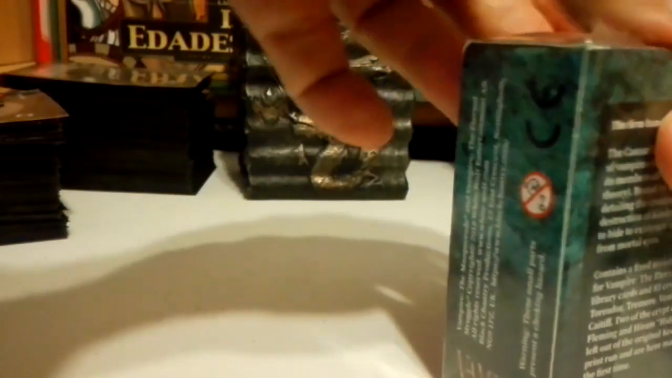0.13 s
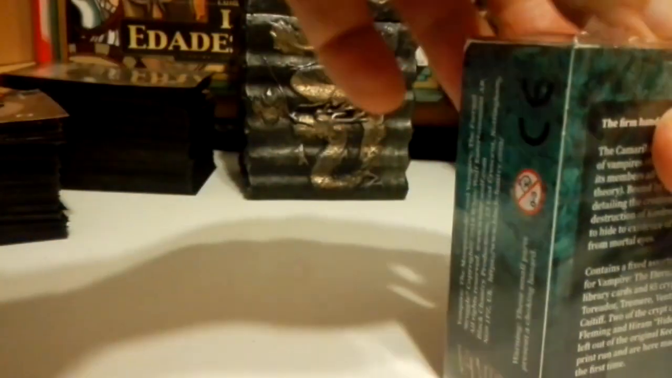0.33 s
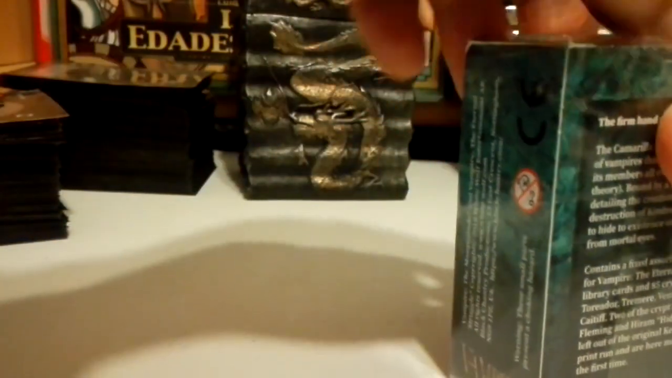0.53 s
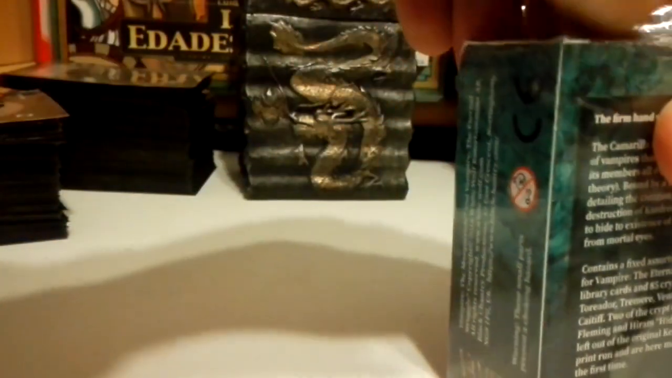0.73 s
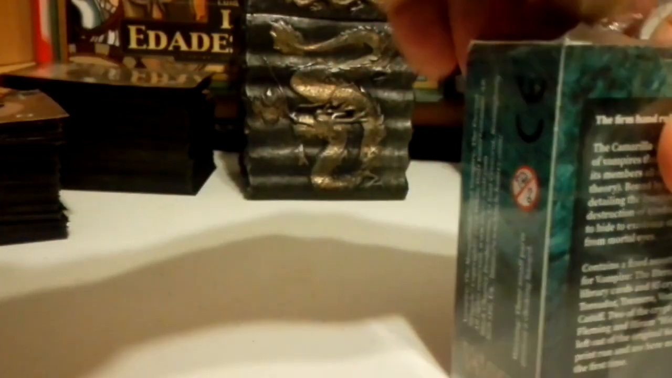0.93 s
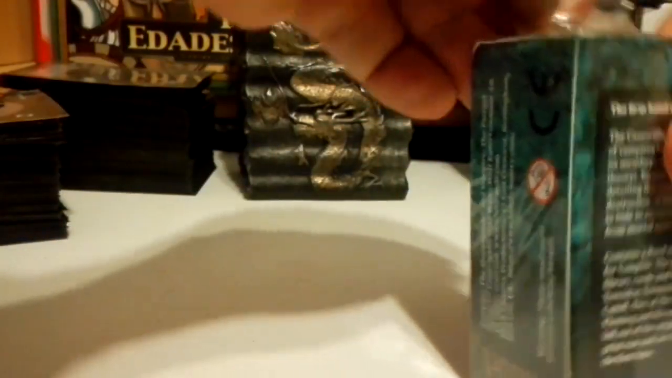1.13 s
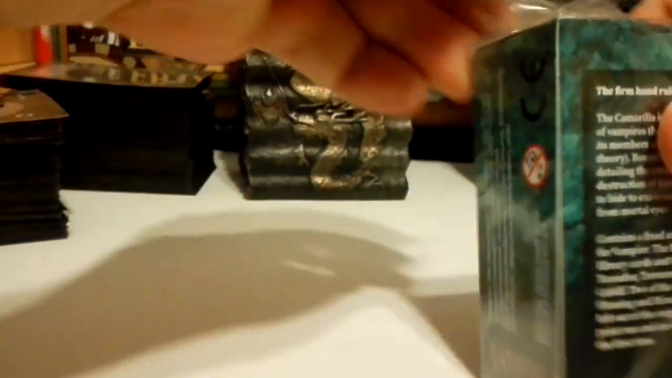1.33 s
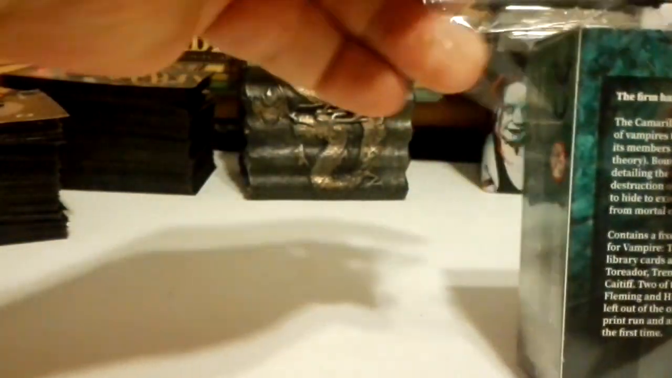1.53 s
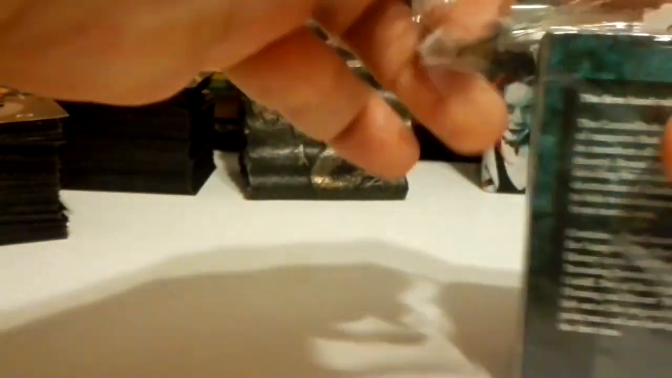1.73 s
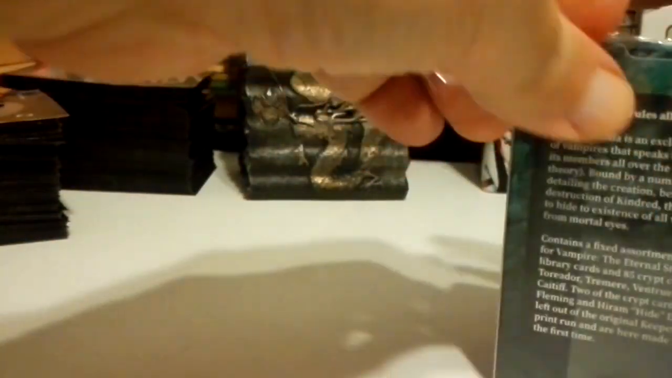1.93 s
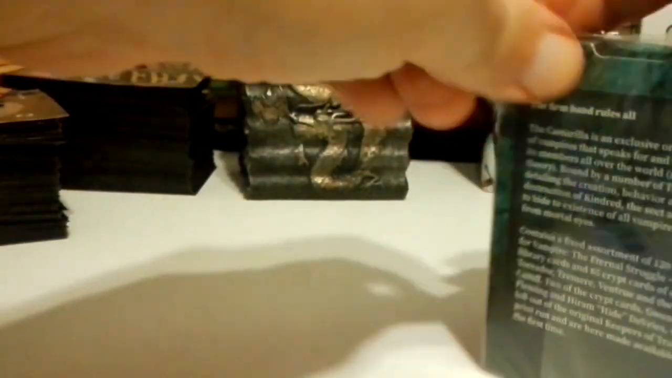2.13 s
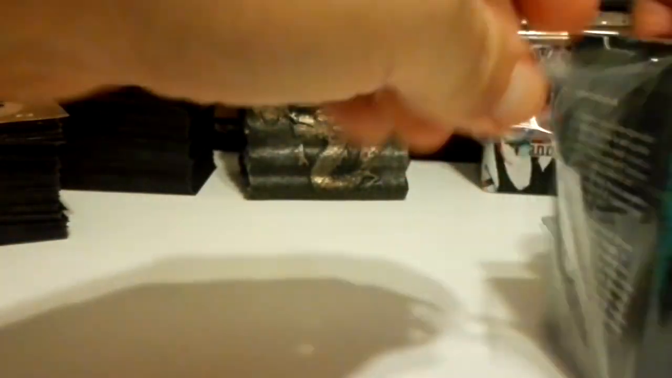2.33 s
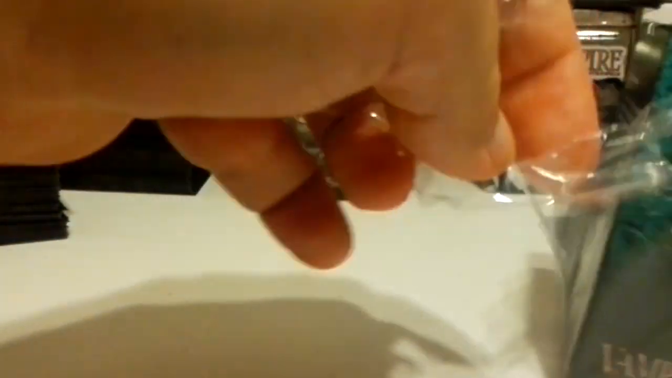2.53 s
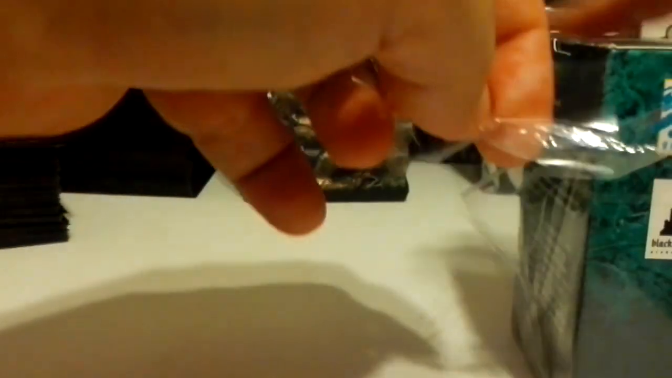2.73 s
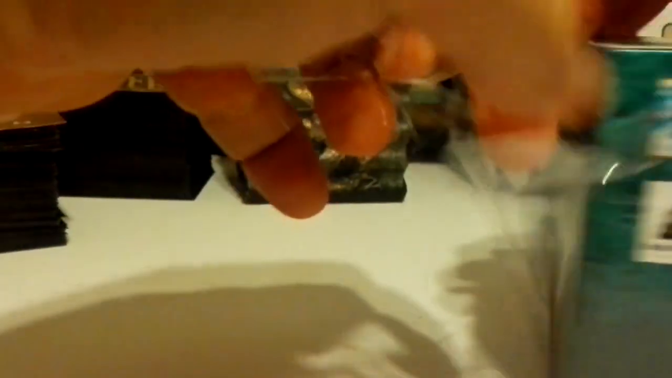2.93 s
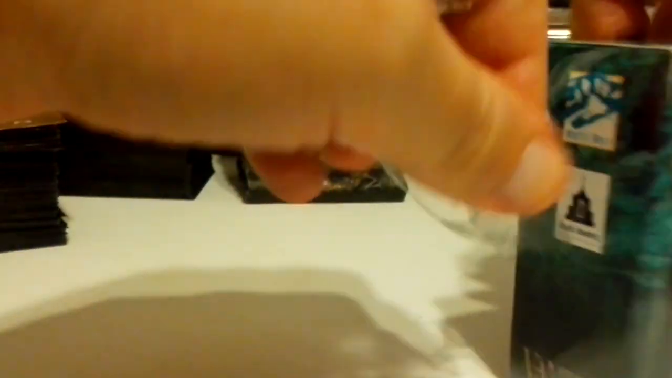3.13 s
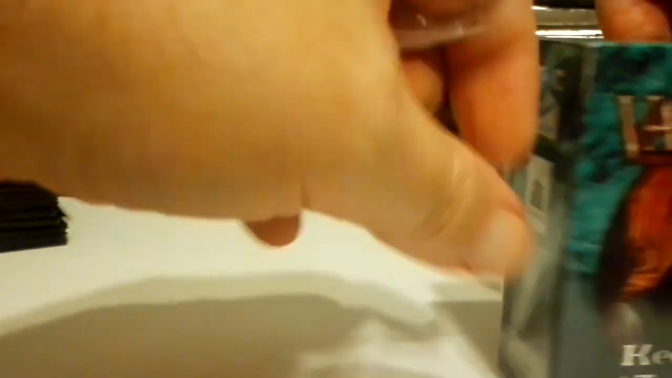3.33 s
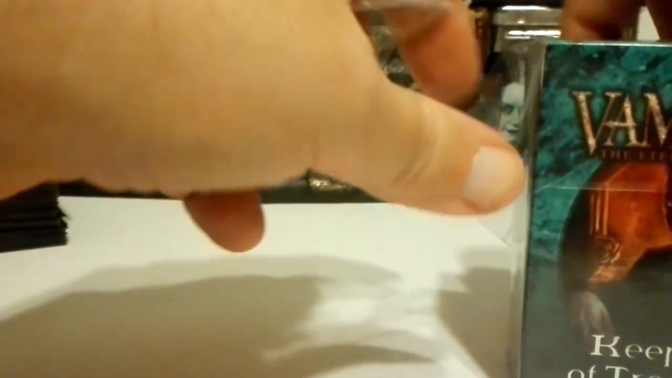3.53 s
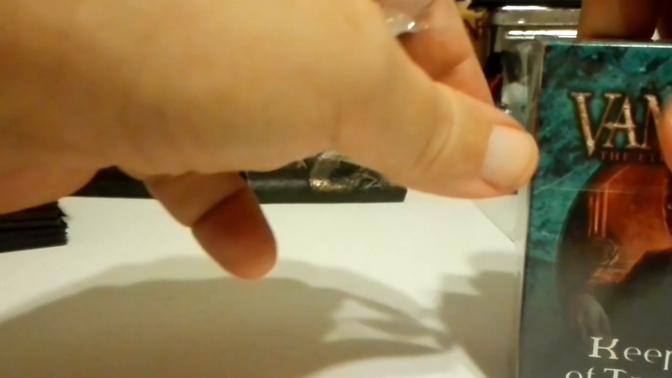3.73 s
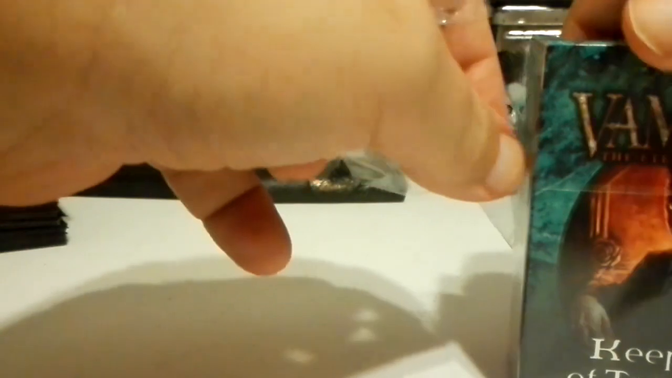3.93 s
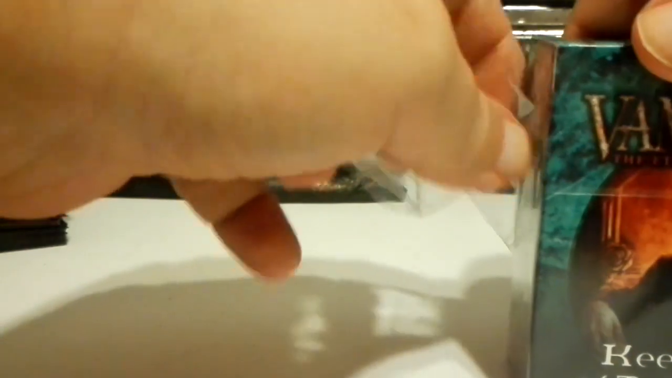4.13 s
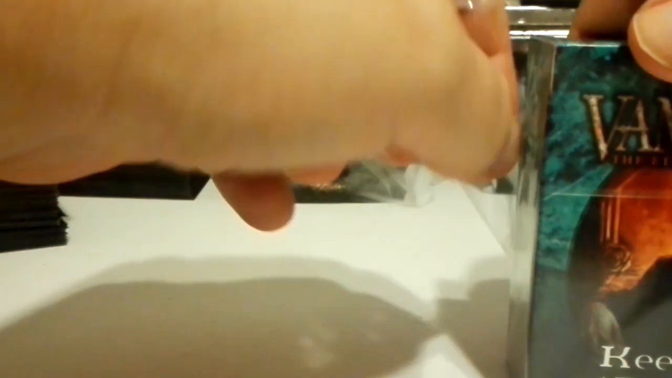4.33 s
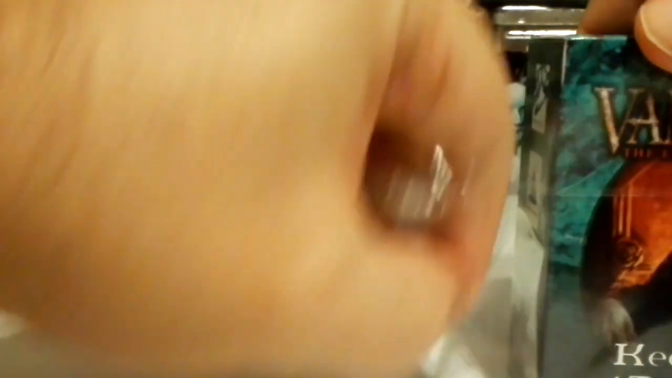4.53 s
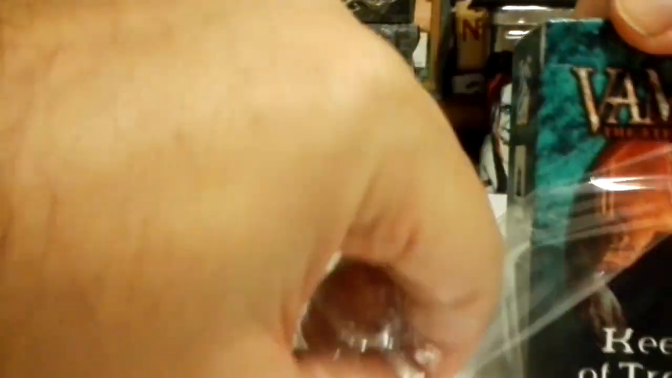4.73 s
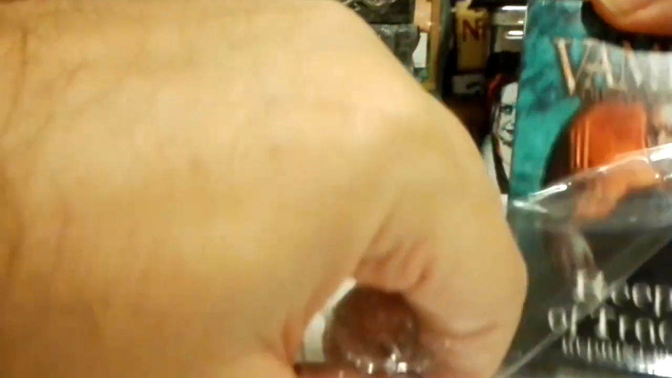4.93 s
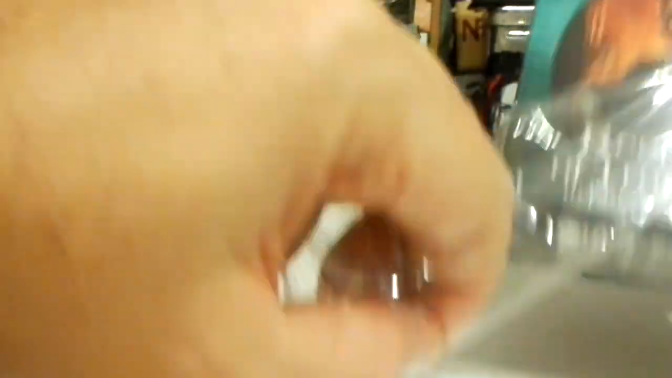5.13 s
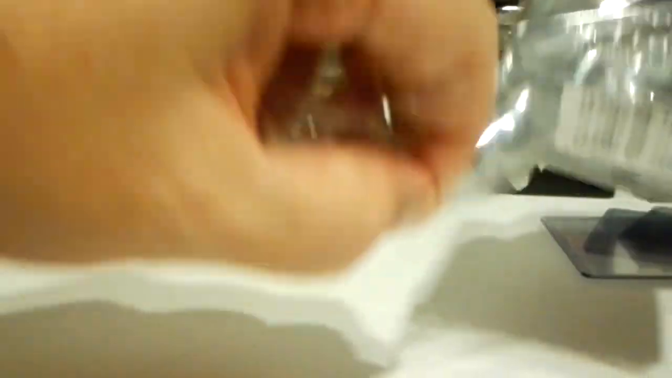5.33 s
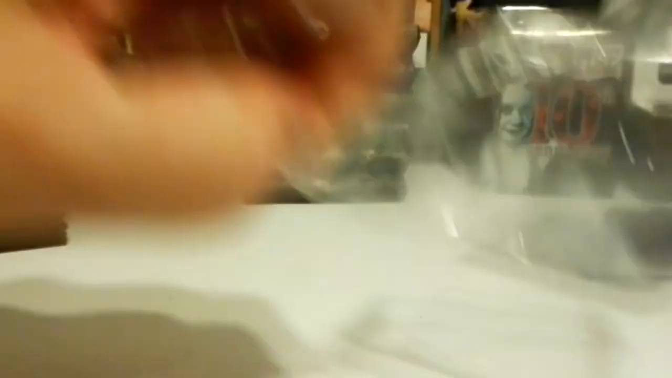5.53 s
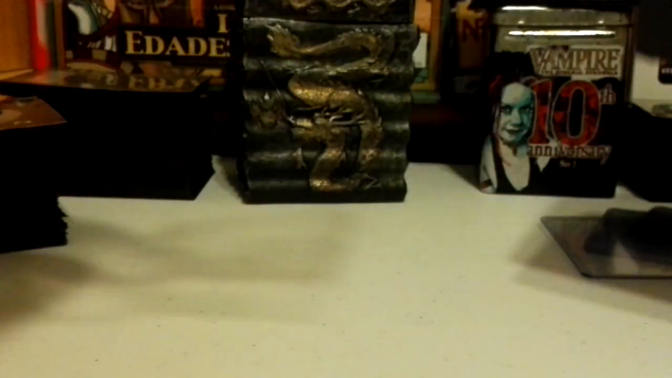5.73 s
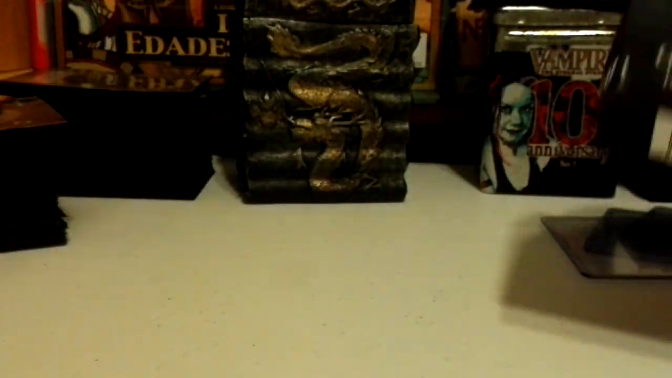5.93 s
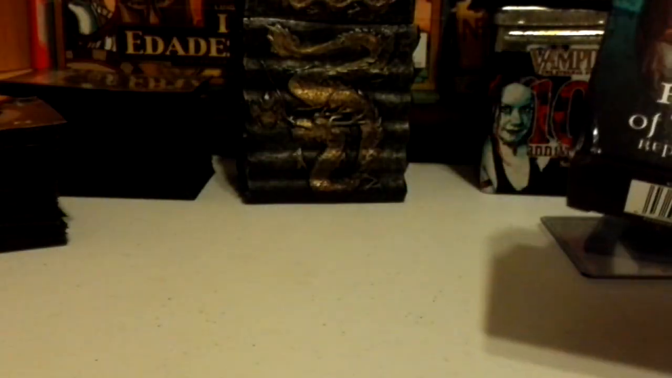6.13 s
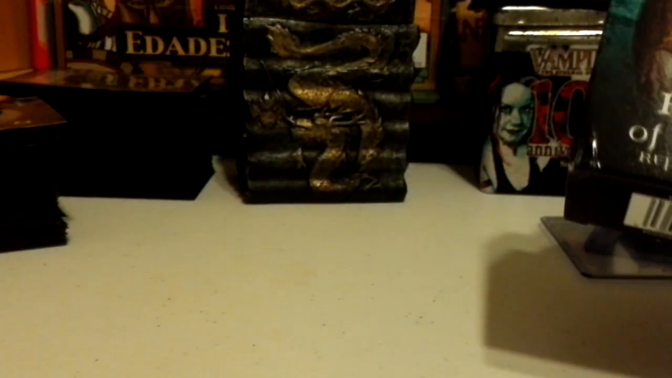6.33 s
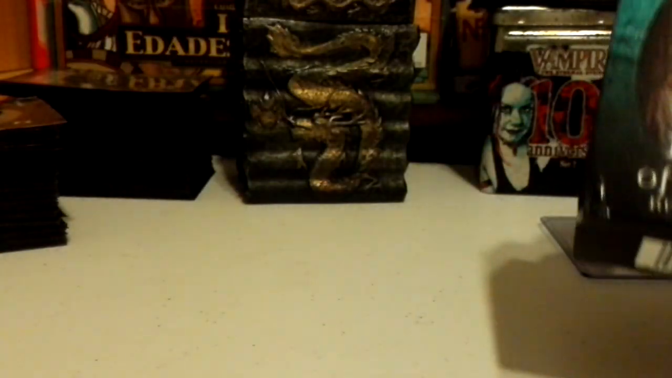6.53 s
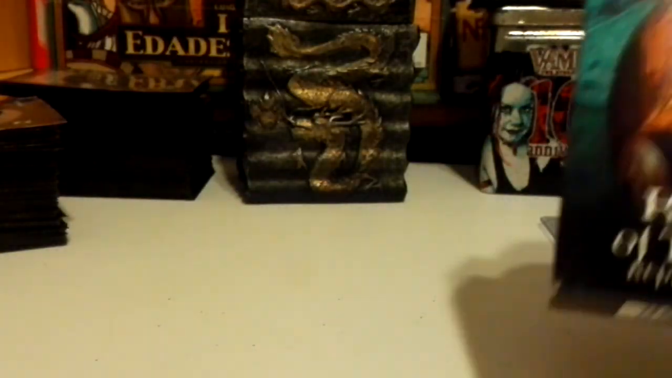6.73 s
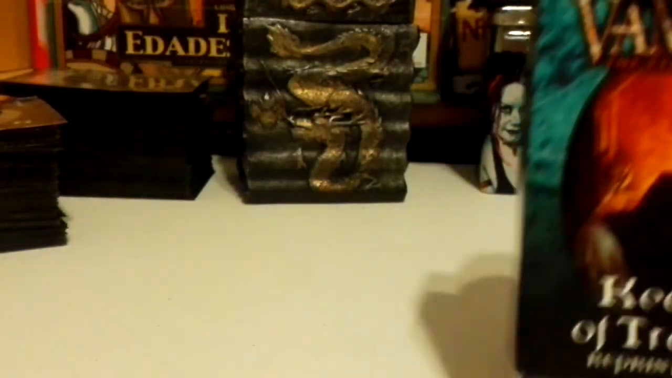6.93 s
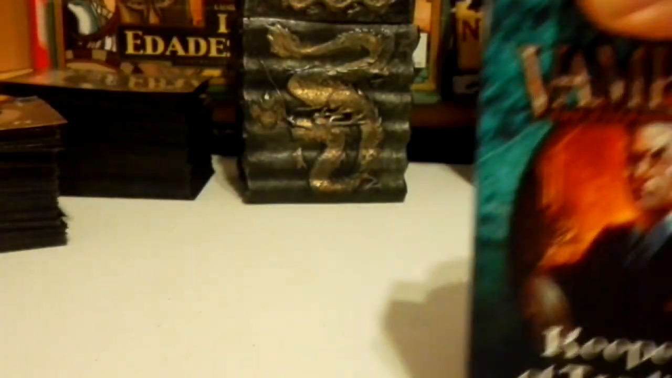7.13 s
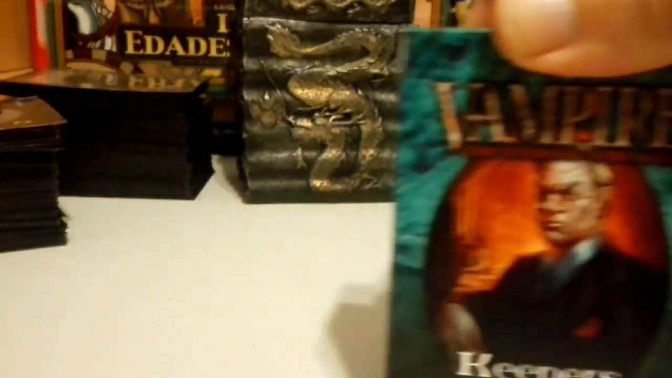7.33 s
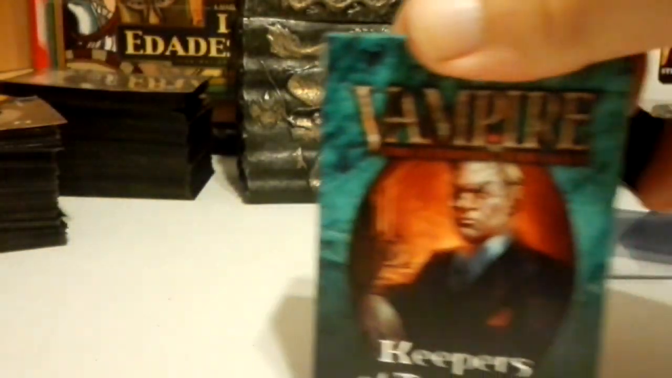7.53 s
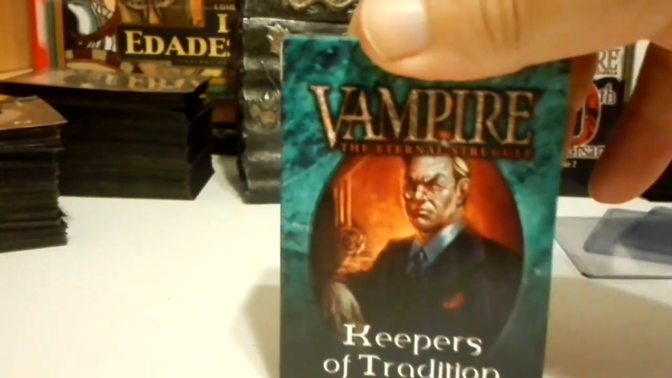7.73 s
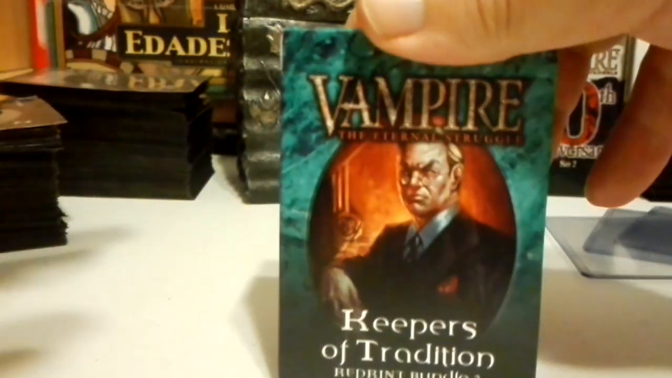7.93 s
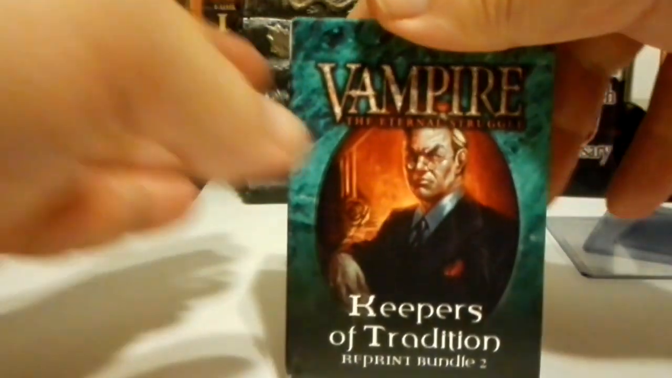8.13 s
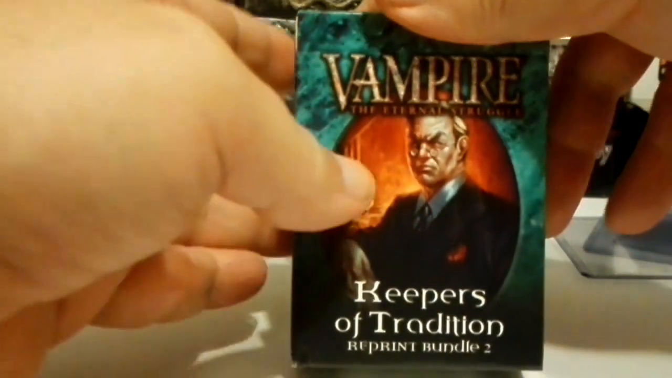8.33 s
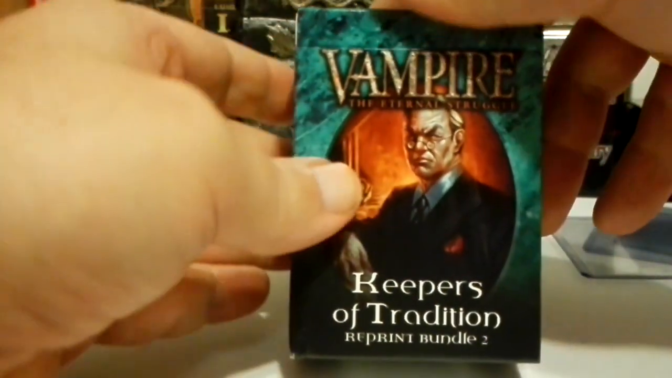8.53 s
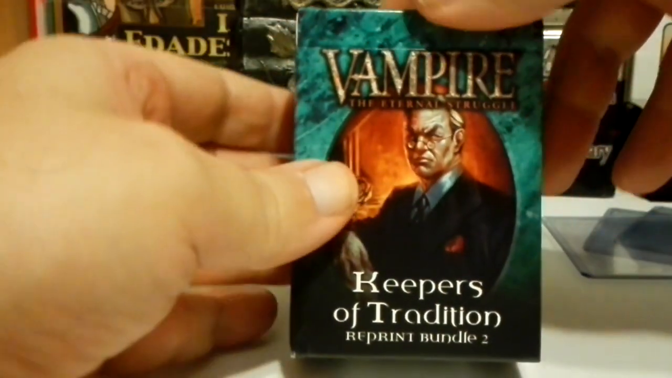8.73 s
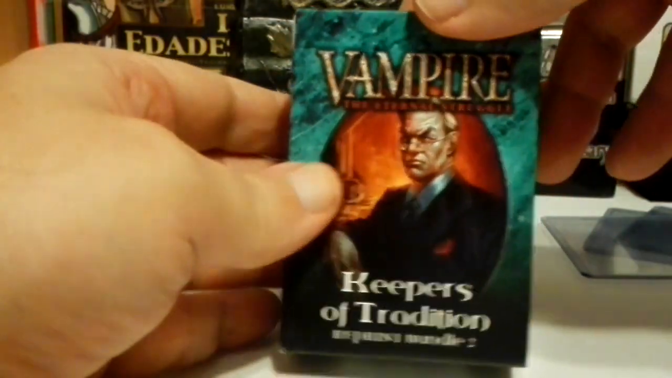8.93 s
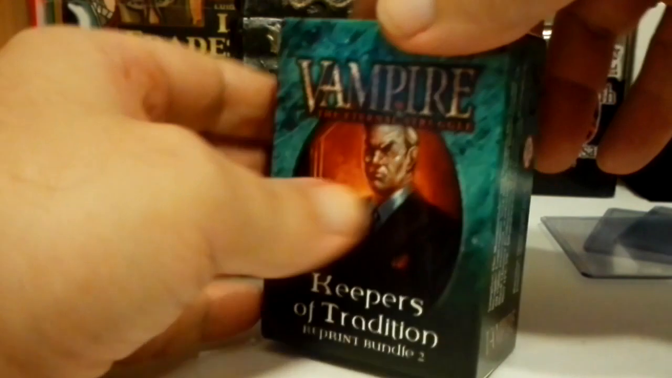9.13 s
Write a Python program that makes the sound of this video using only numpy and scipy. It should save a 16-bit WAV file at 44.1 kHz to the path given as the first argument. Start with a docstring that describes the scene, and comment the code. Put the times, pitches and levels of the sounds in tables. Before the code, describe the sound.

Thin plastic wrap is torn off a small card box, crackling sharply close by, then thins out to faint handling and near silence.

```python
"""Shrink wrap is torn off a small card box and crumpled by hand, close to the left one of two microphones.
It starts with light tugs; from about 0.6 to 5.7 s sharp snaps of buckling film, shaped from bursts of noise,
stand over a bed of tiny crinkles, with short rings of freed panels and soft sine bumps on the hollow box.
The crackle thins out; light handling stops at 7 s, with one faint tug and snap after it, then skin rubs and
touches the card. A small room answers film and bumps; still air and a low hum go on underneath throughout."""
import sys
import numpy as np
from scipy import signal
from scipy.fft import rfft, irfft, next_fast_len
from scipy.io import wavfile
from scipy.ndimage import uniform_filter1d

SR = 44100
rng = np.random.default_rng(int(sys.argv[2]) if len(sys.argv) > 2 else 0)


def log_audio(samples):
    """Write samples as a 16-bit WAV file to the path given in sys.argv[1]."""
    # one column per channel
    frames = np.atleast_2d(samples).T
    # limit to full scale, then quantise
    limited = np.clip(frames, -1, 1)
    pcm = np.round(limited * 32767).astype(np.int16)
    wavfile.write(sys.argv[1], SR, pcm)


N = 405273

# the loudest creases snapping through, levels before trims:
# (time [s], sizzle level [dB], crack level [dB], body level [dB], pitch of the freed panel [Hz])
LARGE_SNAPS = [(0.3294, -28.5, -44, -66.5, 509), (0.4628, -37, -39.5, -61, 452),
               (0.5222, -36, -42.5, -58, 610), (0.6097, -21, -30, -49, 2130), (0.6651, -14, -21, -53, 2540),
               (0.7052, -16, -23, -52, 2600), (0.7913, -13.5, -26.5, -45, 2130),
               (0.8309, -11.5, -21.5, -40, 2030), (0.8584, -10.5, -36, -41, 2160),
               (0.8839, -12.5, -30.5, -42, 1370), (0.941, -20, -26.5, -36, 1380),
               (0.9778, -15, -19, -50, 1890), (0.9837, -28, -26, -32, 1670),
               (1.0833, -27.5, -29.5, -49, 2470), (1.1016, -24, -32, -33.5, 1700),
               (1.1528, -28.5, -27, -53, 2200), (1.1904, -17, -31.5, -36, 2200),
               (1.2146, -15, -27.5, -36, 2380), (1.242, -12, -23, -32, 2290),
               (1.2477, -5, -16.5, -32, 2280), (1.2534, -13.5, -26, -27, 1920),
               (1.2613, -15, -16.5, -27, 1930), (1.283, -10, -24, -32, 1996),
               (1.2978, -8.5, -21, -32, 2260), (1.3105, -11.5, -18.5, -23.5, 1870),
               (1.372, -14, -30.5, -27.5, 2010), (1.4262, -9.5, -18, -31, 604),
               (1.505, -17.5, -35, -43, 630), (1.5303, -19.5, -31.5, -49, 708),
               (1.5407, -19, -27, -36.5, 580), (1.5657, -17, -36, -40, 890), (1.694, -7, -24, -29.5, 866),
               (1.73, -21, -32.5, -38.5, 958), (1.7884, -12.5, -31, -46, 586),
               (1.7985, -9.5, -30, -58, 1290), (1.8461, -14.5, -27, -34, 1910),
               (1.8876, -18, -25, -46, 2590), (1.9515, -16.5, -28, -41.5, 1310),
               (2.0851, -19.5, -43, -29.5, 1370), (2.109, -10, -32, -37, 1300),
               (2.1558, -17, -31, -43, 1340), (2.2436, -21, -34.5, -47, 630), (2.2622, -14, -28, -50, 700),
               (2.2773, -8, -16, -32, 617), (2.2924, -10.5, -31, -34, 1410),
               (2.3276, -7.5, -23, -26.5, 660), (2.3476, -7.5, -34, -36, 649),
               (2.381, -13, -26.5, -44, 730), (2.3969, -10.5, -26, -40, 611),
               (2.4928, -21.5, -31.5, -42, 495), (2.5546, -14, -28, -34.5, 623),
               (2.5945, -14.5, -26, -34, 670), (2.6323, -21, -30, -41, 1360), (2.6497, -14, -25, -38, 2130),
               (2.7293, -17, -33, -42, 600), (2.7603, -19.5, -26.5, -51, 2040),
               (2.802, -16.5, -32, -50, 1980), (2.836, -20.5, -37.5, -54, 2260),
               (2.898, -23.5, -36, -49, 635), (2.9387, -20, -30.5, -38, 624), (3.0065, -12, -28, -54, 2260),
               (3.035, -11.5, -33, -57, 2350), (3.0545, -10.5, -34, -35, 694),
               (3.0831, -19.5, -26, -32, 1280), (3.1442, -17, -29, -45, 2240),
               (3.1649, -14, -25.5, -41, 645), (3.2098, -10, -33, -36, 2150),
               (3.247, -9.5, -28.5, -32, 750), (3.298, -10, -26.5, -33, 1230), (3.4023, -9, -40, -43, 2370),
               (3.4206, -21.5, -28.5, -28.5, 676), (3.4431, -12, -37, -27, 590),
               (3.5332, -24, -36.5, -48, 2420), (3.6962, -22, -34, -44, 991),
               (3.7108, -19.5, -42, -54, 630), (3.7645, -21, -38.5, -38, 657),
               (3.8118, -19.5, -31.5, -63, 2340), (3.919, -17, -44, -41.5, 880),
               (4.0123, -28.5, -33, -51, 670), (4.0893, -22.5, -50, -64, 574), (4.138, -31, -43, -52, 750),
               (4.291, -22.5, -38, -43, 657), (4.3251, -18, -43, -43.5, 708),
               (4.3986, -12.5, -39, -48, 1320), (4.4296, -7, -30, -31.5, 614),
               (4.4842, -6.5, -23.5, -30.5, 1260), (4.5134, -6.5, -23.5, -32, 620),
               (4.5902, -14, -37, -44, 650), (4.6688, -19, -55, -52, 452), (4.764, -7, -22.5, -18.5, 1266),
               (4.8482, -17, -40, -55, 1380), (4.904, -7, -25, -51, 2450),
               (4.9739, -11.5, -28.5, -39.5, 950), (4.985, -6, -29, -33, 694),
               (5.022, -18, -25.5, -45, 614), (5.0515, -24.5, -27, -30, 1300),
               (5.114, -9.5, -31.5, -34, 660), (5.1359, -22, -27, -57, 610),
               (5.294, -25, -31.5, -47.5, 657), (5.4102, -15.5, -27, -53, 1440),
               (5.4818, -21, -42, -41.5, 1320), (5.5022, -19, -34.5, -42, 991), (5.52, -30, -44, -41, 603),
               (5.6085, -13, -42, -61, 626), (5.7096, -19.5, -31.5, -50, 773), (5.8657, -27, -38, -52, 980),
               (6.129, -33, -48, -67, 2340), (6.2447, -27, -50, -49, 2200), (6.354, -25.5, -50, -49, 1670),
               (6.6827, -39, -44, -52, 1720), (6.793, -40, -50, -62, 1950), (6.9272, -34.5, -54, -75, 460),
               (7.2607, -43.5, -62, -58, 610)]
HANDLING_END_S = 7.04  # the light handling and the lesser snaps stop


def snaps(pull_db, length_s=0.0045):
    """Creases give way one by one, some as a dry tick, some with a flutter; low ranges move more slowly."""
    # a large crease cracks 0.6 ms after its listed time; the rest are level trims in dB
    large = np.array(LARGE_SNAPS)[:, :4] + [0.0006, -5, 0, -5]
    times, *levels_db = np.vstack([large, small_snaps(pull_db)]).T
    dryness = rng.random(N)[:len(times)] ** 2
    envelopes = []
    for db, slow in zip(levels_db, [1, 1.5, 1.7]):
        energy = amp(db) ** 2 * length_s * SR
        tick = buckle(strikes(times, energy * dryness), crack_t60=0.0024 * slow,
                      flutter_t60=0.019, flutter_db=-11.5, swell_t60=0.006, swell_db=-10.5)
        flutter = buckle(strikes(times, energy * (1 - dryness)), crack_t60=0.0015,
                         flutter_t60=0.019 * slow, flutter_db=0, swell_t60=0.0038, swell_db=-1)
        envelopes.append(np.hypot(tick, flutter))
    return radiate(*envelopes)


def small_snaps(pull_db, per_second=16, over_db=5, spread_db=3, ceiling_db=-27, count=400):
    """Lesser creases give way at random during the handling: rows (s, sizzle dB, crack dB, body dB)."""
    when, chance = rng.random((count, 2)).T
    times = when * HANDLING_END_S
    db = pull_db[:, (times * SR).astype(int).clip(0, N - 1)] + over_db
    too_loud_db = np.maximum(db[0] - ceiling_db, 0)
    db = db - too_loud_db + spread_db * rng.standard_normal((count, 3)).T
    return np.vstack([times, db]).T[chance < per_second * HANDLING_END_S / count]


def crinkle(pull_db, per_second=750, loud_db=-28, crowding=0.51, spread_db=6, order=1700):
    """Tiny creases pop at random: single ticks under a light touch, a dense tearing under a hard pull."""
    # per_second holds when the sizzle is at loud_db; the rate never falls below 300 per second
    rate = np.maximum(per_second * amp(crowding * (pull_db[0] - loud_db)), 300)
    pops = (rng.random(N) < rate / SR) * amp(spread_db * rng.standard_normal(N)) ** 2
    envelopes = []
    for db, trim_db in zip(pull_db, [-1, -0.5, -1.5]):
        own = pops * amp(3.2 * rng.standard_normal(N)) ** 2
        own /= np.abs(uniform_filter1d(own, order)) + 1e-7  # neighbouring pops share the hand's pull
        grain = buckle(own, crack_t60=0.0017, flutter_t60=0.027, flutter_db=1, swell_t60=0.0053, swell_db=1.5)
        envelopes.append(grain * amp(db + trim_db))
    return radiate(*envelopes)


def panels(cycles=22, level_db=2):
    """Each large snap frees a taut panel of film, which rings for a few cycles like a tiny drum."""
    out = np.zeros((2, N + SR))
    t = np.arange(SR // 20) / SR
    phases = rng.normal(0, 1.0, (len(LARGE_SNAPS), 2))
    for (start, _, _, body_db, hz), phase in zip(LARGE_SNAPS, phases):
        decay = amp(body_db + level_db - 60 * hz * t / cycles)
        ring = decay * (1 - np.exp(-2 * hz * t))
        out[:, round(start * SR):][:, :len(t)] += ring * np.sin(2 * np.pi * hz * t + phase[:, None])
    return out[:, :N] * amp([[1], [-1]])  # left a little louder than right


def pull():
    """Sizzle, crack and body levels of the moving film in dB: tugs on top of light handling."""
    # tugs and squeezes, levels of the pull before trims:
    # (start [s], length [s], sizzle level [dB], body level [dB])
    tugs = np.array([(0.026, 0.07, -43.5, -63), (0.158, 0.074, -47, -66), (0.277, 0.066, -49, -66.5),
                     (0.444, 0.025, -50, -66), (0.532, 0.078, -44, -62), (0.647, 0.062, -25.5, -45.5),
                     (0.782, 0.062, -24.5, -51), (0.955, 0.033, -26.5, -36.5), (1.227, 0.11, -25.5, -40),
                     (1.36, 0.13, -32, -55), (1.549, 0.033, -30.5, -50), (1.697, 0.016, -44, -52.5),
                     (1.813, 0.086, -29.5, -45), (2.078, 0.055, -27.5, -43.5), (2.271, 0.084, -23.5, -36),
                     (2.384, .055, -25.5, -45), (2.585, 0.0083, -22, -35.5), (2.608, 0.007, -33, -62),
                     (2.749, 0.027, -24.5, -50), (2.822, 0.01, -21, -41), (3.047, 0.032, -24.5, -36),
                     (3.151, 0.0092, -30.5, -38.5), (3.262, 0.076, -29, -41), (3.391, 0.049, -18, -35),
                     (3.682, 0.036, -31.5, -51.5), (3.937, 0.016, -31, -50), (4.103, 0.0077, -49, -51),
                     (4.163, 0.006, -33.5, -44), (4.283, 0.021, -41, -48), (4.395, 0.076, -25.5, -42.5),
                     (4.511, 0.049, -40, -47), (4.595, 0.011, -27, -40.5), (4.764, 0.015, -30, -46.5),
                     (4.922, 0.019, -28, -55.5), (4.984, 0.066, -23.5, -48), (5.122, 0.052, -29.5, -48.5),
                     (5.351, 0.058, -25, -50.5), (5.384, 0.032, -21, -36.5), (5.459, 0.088, -31, -55),
                     (5.608, 0.015, -29, -52.5), (5.711, 0.028, -29.5, -56), (5.88, 0.12, -44.5, -65.5),
                     (6.178, 0.11, -44, -65), (6.356, 0.028, -43, -65), (6.509, 0.032, -45.5, -65),
                     (6.613, 0.084, -44.5, -65), (6.772, .1, -53.5, -69), (6.979, 0.013, -52, -65),
                     (7.162, .015, -50, -68)])
    # light handling of the film between tugs, before the offsets below: (time [s], level [dB])
    light_touch = [(0.0, -60), (0.47, -64.5), (0.8, -47.5), (1.12, -40), (1.35, -45), (1.88, -40),
                   (3.29, -45.5), (3.51, -50.5), (4.35, -46.5), (4.49, -42.5), (5.0, -43), (5.14, -54.5),
                   (5.55, -45.5), (6.06, -66), (6.78, -59), (7.04, -73)]
    rise_s, fall_s = 0.11, 0.088  # time for a tug to build up and to die away by 60 dB
    handling_db, = curves(light_touch)
    handled = np.arange(N) / SR < HANDLING_END_S

    def level(rows, offset_db):
        handling = handled * amp(handling_db + offset_db) ** 2
        return 10 * np.log10(strokes(rows, rise_s, fall_s) + handling)

    sizzle = level(tugs[:, [0, 1, 2]], 3.5)
    body = level(tugs[:, [0, 1, 3]], -12)
    crack = sizzle + 0.41 * (body - sizzle)  # the crack lies between the two
    return np.array([sizzle, crack, body])


def stillness(hold_s=0.019, hold_db=-4):
    """Dip of the pull in dB before each large snap: the film holds still while the crease takes the strain."""
    t = np.arange(N) / SR
    times = np.append(np.sort(np.array(LARGE_SNAPS)[:, 0]), np.inf)
    wait = times[np.searchsorted(times, t)] - t
    return hold_db * np.exp(-(wait / hold_s) ** 2)


def buckle(power, crack_t60, flutter_t60, flutter_db, swell_t60, swell_db):
    """Envelope of buckling film: a brief swell of noise, a hard crack, a short flutter (t60s in s)."""
    t = np.arange(-(SR // 20), SR // 20 + 1) / SR

    def fall(t60):
        return amp(-60 * np.abs(t) / t60)

    before = amp(swell_db) * fall(swell_t60)
    after = fall(crack_t60) + amp(flutter_db) * fall(flutter_t60)
    shape = np.where(t < 0, before, after) ** 2
    return np.sqrt(np.abs(signal.fftconvolve(power, shape / shape.sum(), "same")))


def radiate(sizzle, crack, body):
    """Noise in four pitch ranges of the film, each played by its envelope; tension shifts the body up or down."""
    # sound of the film: (frequency [Hz], level [dB])
    film_colour = [(60, -33), (160, -22), (450, -21.5), (1000, -18), (2600, -16), (4500, -11.5),
                   (6200, -7.5), (9500, -3.5), (11500, 3), (14100, 0), (14900, -26), (16000, -46.5)]
    # resonances of the box and the cupped hand: (frequency [Hz], width [Hz], boost [dB])
    hollow = [(655, 91, 6), (1376, 200, 6.5), (1928, 340, 4), (3350, 83, 4.5)]
    # level of the right side against the left: (frequency [Hz], level [dB])
    right_level = [(200, -2), (900, 0.5), (1350, -3.5), (2000, -1), (3400, 0.5), (6000, -5), (8100, -10.5),
                   (11500, -18), (15000, -14.5)]
    # edges between sizzle, crack, upper body and lower body: (frequency [Hz])
    edges = (8000, 2200, 1050)
    hz = grid()
    colour = amp(along(film_colour, hz) + peaks(hollow))
    taut = amp(tension())
    lower = body / np.sqrt(1 + taut ** 2)
    envelopes = (sizzle, crack, lower * taut, lower)
    below = [1] + [1 / (1 + (hz / edge) ** 10) for edge in edges] + [0]  # power passed below each edge
    out = 0
    for envelope, top, bottom in zip(envelopes, below, below[1:]):
        gain = colour * np.sqrt(top * (1 - bottom))
        response = causal(gain / np.sqrt(np.mean(gain ** 2)))
        out = out + filtered(envelope * facets(pair()), response)
    return np.array([out[0], filtered(out[1], amp(along(right_level, hz)))])


def tension(middle_hz=1080, db_per_octave=21.5, slack_db=-1.5, tautest_db=8):
    """Upper over lower body in dB: taut film rings high, slack film low, from one freed panel to the next."""
    times, *_, hz = np.transpose(LARGE_SNAPS)
    taut_db = np.clip(db_per_octave * np.log2(hz / middle_hz), slack_db, tautest_db)
    return np.interp(np.arange(N) / SR, times, taut_db)


def facets(x, narrow_db=5, wide_db=3.5, size=256):
    """The film keeps changing shape, so each instant favours other resonances, narrow and wide."""
    z = signal.stft(x, nperseg=size)[2]

    def chance(order):
        across_pitch = uniform_filter1d(rng.standard_normal(z.shape[1:]), order, axis=0)
        return uniform_filter1d(across_pitch, size=3, axis=0)

    narrow, wide = chance(order=3), chance(order=10)
    gain = amp(narrow_db * narrow / narrow.std() + wide_db * wide / wide.std())
    gain /= np.sqrt(uniform_filter1d(gain ** 2, size=40, axis=0))  # colour changes, strength does not
    return unit(signal.istft(z * gain, nperseg=size)[1][:, :N])


def bumps(box_hz=80, box_t60=0.23, push_t60=0.02, rise_cycles=0.32):
    """A soft blow of the hand gives one low push, then the box wobbles on the desk."""
    # soft bumps, levels before the gains below: (time [s], level [dB], pitch of the push [Hz])
    blows = [(1.102, -35.5, 161), (1.141, -42, 95), (1.286, -36.5, 220), (1.425, -32, 174),
             (1.473, -41, 200), (2.349, -40, 179), (2.6, -18, 131), (2.634, -30, 112), (2.668, -35, 100),
             (2.743, -36, 290), (2.904, -40, 157), (3.056, -38, 134), (3.443, -40.5, 240),
             (4.432, -41, 238), (4.78, -40, 131), (5.41, -39, 190), (9.029, -49, 94.5)]
    thud = np.zeros(N + SR)
    t = np.arange(SR // 3) / SR
    wobble = amp(-4.0 - 60 * t / box_t60) * np.sin(2 * np.pi * box_hz * t)
    for start, db, hz in blows:
        push = amp(8 - 60 * t / push_t60) * np.sin(2 * np.pi * hz * t)
        softness = 1 - np.exp(-t * hz / rise_cycles)
        thud[round(start * SR):][:len(t)] += amp(db) * (push + wobble * (box_hz / hz) ** 2) * softness
    return thud[:N] * np.ones((2, 1))


def hands(pull_db, grip_db=-5, strain_db=-14, touch_s=0.004, touch_fade_s=0.041, swell_s=0.4):
    """Skin rumbles on the hollow box, more so with each tug, and hisses over its face."""
    # hands holding the box, before grip_db: (time [s], level [dB])
    grip = [(0.0, -57), (0.69, -59.5), (1.33, -84), (1.76, -57.5), (2.15, -50), (3.15, -57), (3.71, -59),
            (4.5, -57), (6.3, -70.5), (7.68, -62), (8.68, -66.5), (9.19, -59)]
    # skin rubbing on the card: (start [s], length [s], rumble level [dB], hiss level [dB])
    rubs = np.array([(1.102, 0.037, -50, -73), (1.388, 0.064, -47.5, -75), (2.877, 0.098, -51, -70),
                     (7.5, 0.49, -67, -72.5), (8.99, 0.074, -57, -66.5)])
    # fingertips landing on the bare card: (time [s], level [dB])
    touches = [(8.176, -65), (8.38, -73), (8.452, -67.5)]
    # colours of the rumble and of the sliding skin: (frequency [Hz], level [dB])
    rumble_colour = [(25, -20.5), (70, -2), (130, 1), (180, -7), (300, -8), (600, -15), (1500, -34.5)]
    skin_colour = [(500, -14), (2000, -9), (4000, -13), (8000, -20), (11500, -6.5), (14000, -20),
                   (15000, -39)]
    hold_db, = curves(grip)
    # swell_s and touch_fade_s: time to swell or fade by 60 dB
    rumble = amp(hold_db + grip_db) ** 2 + amp(pull_db[2] + strain_db) ** 2
    rumble += strokes(rubs[:, [0, 1, 2]], swell_s, swell_s)
    hiss = strokes([(start, touch_s, db) for start, db in touches], touch_fade_s, touch_fade_s)
    hiss += strokes(rubs[:, [0, 1, 3]], swell_s, swell_s)
    return np.sqrt(rumble) * rush(rumble_colour) + np.sqrt(hiss) * rush(skin_colour)


def room(x):
    """Echoes blur into a diffuse tail of fading noise, in which the treble dies before the middle."""
    # reverberation: (frequency [Hz], time to fall by 60 dB [s])
    fade_times = [(200, 0.072), (2000, 0.19), (12000, 0.08)]
    hz, t, z = signal.stft(rng.standard_normal((2, SR // 2)), SR, nperseg=256)
    fading = z * amp(-60 * t / along(fade_times, hz)[:, None])
    tail = signal.istft(fading, SR, nperseg=256)[1]
    tail *= 1 - np.exp(-np.arange(tail.shape[1]) / SR / 0.0013)  # soft onset
    return signal.fftconvolve(x, tail / np.linalg.norm(tail[0]), axes=1)[:, :N]


def background(air_db=-63.5, hum_db=-67, mains_hz=60):
    """Still room air as steady noise and a faint electrical hum as a sine."""
    # colour of the room air: (frequency [Hz], level [dB])
    air_colour = [(25, 1), (42, -11), (62, -4), (100, -2.5), (170, -17.5), (400, -15), (600, -20.5),
                  (760, -20), (2200, -24.5), (6000, -31.5), (11600, -29), (14200, -30.5), (15000, -60)]
    hum = np.sin(2 * np.pi * mains_hz * np.arange(N) / SR)
    return amp(air_db) * rush(air_colour) + amp(hum_db) * hum


def rush(spectrum):
    """Steady stereo noise, its left side of rms 1, with the low resonances of the surroundings."""
    # narrow resonances in the quiet low drone: (frequency [Hz], width [Hz], boost [dB])
    drone = [(122.2, 26, 1.5), (213, 18, 9.5), (327, 51, 3.5), (595, 14, 10.5)]
    return unit(filtered(pair(), amp(along(spectrum, grid()) + peaks(drone))))


def pair():
    """White noise at two microphones: alike in the bass, nearly unrelated in the treble."""
    # likeness of the two microphones: (frequency [Hz], likeness [0-1])
    likeness = [(100, .97), (300, 0.92), (640, 0.83), (1400, 0.8), (2500, 0.11)]
    turn = np.arccos(np.clip(along(likeness, grid()), -1, 1)) / 2
    mid = filtered(rng.standard_normal(N), np.cos(turn))
    side = filtered(rng.standard_normal(N), np.sin(turn))
    return np.array([mid + side, mid - side])


def strikes(times, sizes):
    """Single impulses at the given times."""
    return np.bincount(np.clip(np.round(times * SR).astype(int), 0, N - 1), sizes, N)


def strokes(rows, rise_s, fall_s, size=32):
    """Power per sample of strokes (start, length, dB) that each build up, hold and die away."""
    t = np.arange(0, N, size) / SR
    start, length, db = np.transpose(rows)[:, :, None]
    outside = np.maximum(start - t, 0) / rise_s + np.maximum(t - start - length, 0) / fall_s
    power = np.sum(amp(db - 60 * np.minimum(outside, 2)) ** 2, axis=0)
    return np.interp(np.arange(N) / SR, t, power)


def peaks(modes):
    """Boost in dB of a set of resonances, on the grid."""
    return sum(db / (1 + (2 * (grid() - centre) / width) ** 2) for centre, width, db in modes)


def amp(db):
    """Turn decibels into an amplitude factor."""
    return 10 ** (np.asarray(db) / 20)


def unit(x):
    """Scale a stereo pair so that its left side has rms 1."""
    return x / np.sqrt(np.mean(x[0] ** 2) + 1e-20)


def along(points, hz):
    """Read a curve of (Hz, value) points on a log frequency axis."""
    f, v = np.transpose(points)
    return np.interp(np.log(hz + 1), np.log(f + 1), v)


def curves(rows):
    """One value per sample for each column after the time."""
    times, *columns = np.transpose(rows)
    return [np.interp(np.arange(N) / SR, times, column) for column in columns]


def grid():
    """Frequencies in Hz of the long transform."""
    return np.fft.rfftfreq(2 * next_fast_len(N // 2 + SR // 4), 1 / SR)


def filtered(x, response):
    """Filter x by a response given on the grid."""
    return irfft(rfft(x, 2 * (response.shape[-1] - 1)) * response)[..., :N]


def causal(gain):
    """The minimum-phase response with this gain: it rings only after a blow."""
    cepstrum = irfft(np.log(np.maximum(gain, 1e-5)))
    half = len(cepstrum) // 2
    cepstrum[1:half] *= 2
    cepstrum[half + 1:] = 0
    return np.exp(rfft(cepstrum))


def scene():
    """Film, box and hands in a small room; one pull drives the crinkling, the lesser snaps and the rumble."""
    pull_db = pull() + stillness()
    film = snaps(pull_db) + panels() + crinkle(pull_db)
    knocks = bumps()
    echoes = room(amp([[-14.5], [-11.5]]) * film + amp(-12.5) * knocks)
    return film + knocks + echoes + hands(pull_db) + background()


def record(dry, lag_s=0.00018, right_db=-1, low_cut_hz=42, top_hz=16400):
    """Sound reaches the right microphone a little later; deep bass is trimmed, peaks and band are limited."""
    hz = grid()
    right = amp(right_db) * np.exp(-2j * np.pi * hz * lag_s)
    ports = np.array([np.ones(len(hz)), right])
    u = 1j * hz / low_cut_hz
    heard = filtered(dry, ports * u * u / (1 + u + u * u))
    return filtered(np.clip(heard, -1, 1), hz < top_hz)


dry = scene()
out = record(dry)
log_audio(out)
```